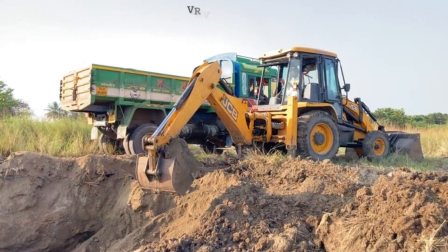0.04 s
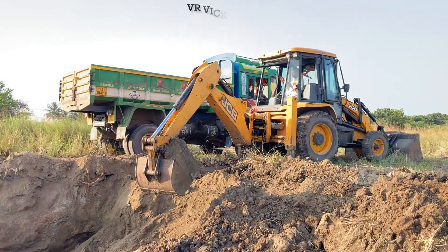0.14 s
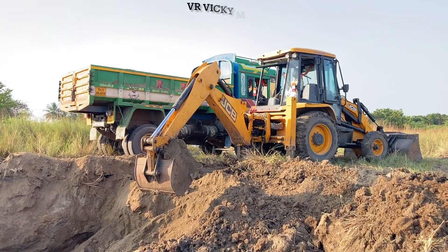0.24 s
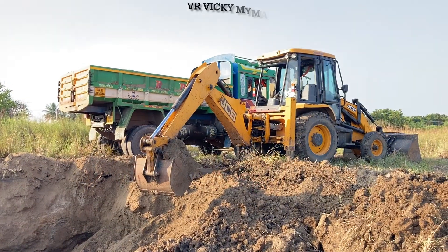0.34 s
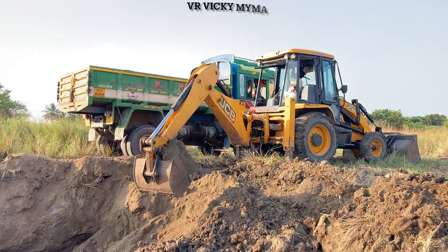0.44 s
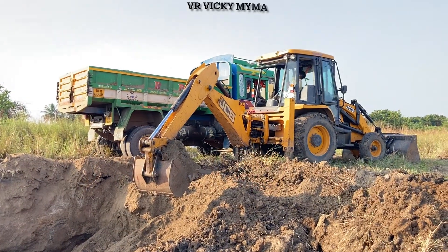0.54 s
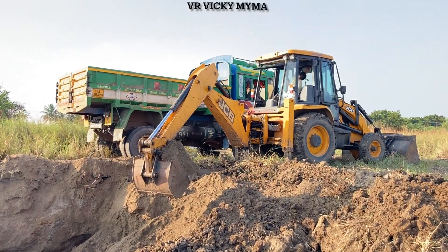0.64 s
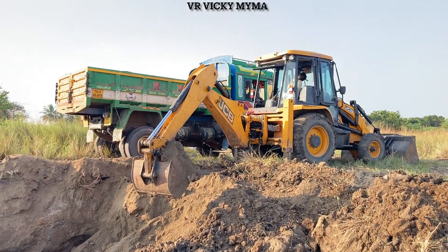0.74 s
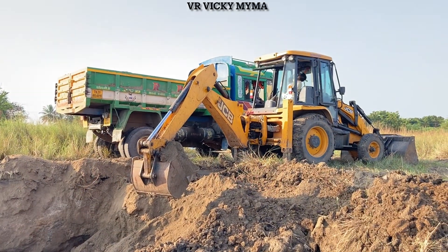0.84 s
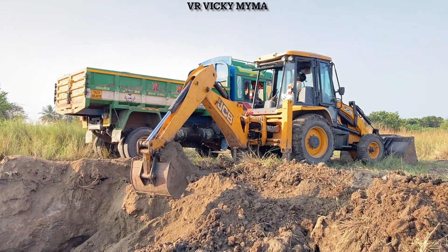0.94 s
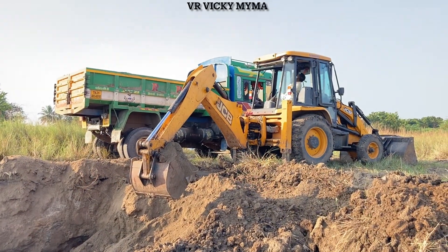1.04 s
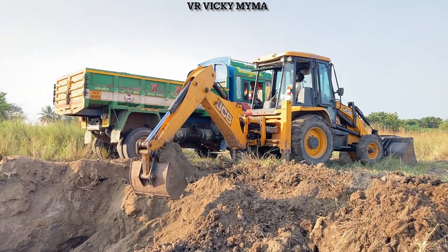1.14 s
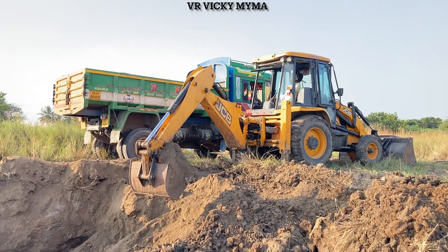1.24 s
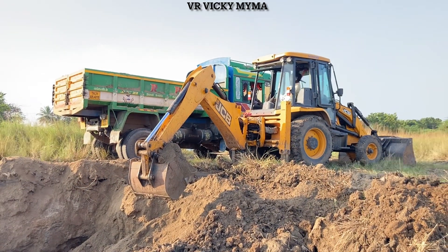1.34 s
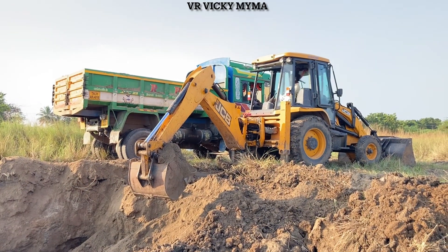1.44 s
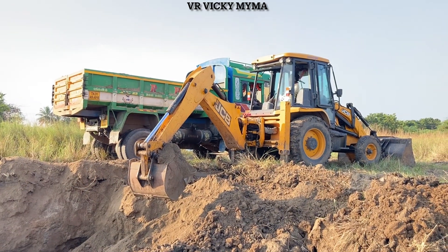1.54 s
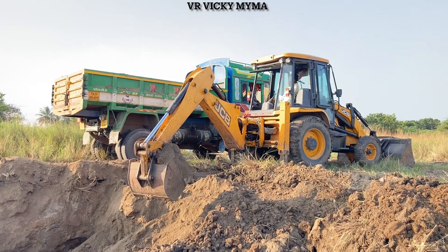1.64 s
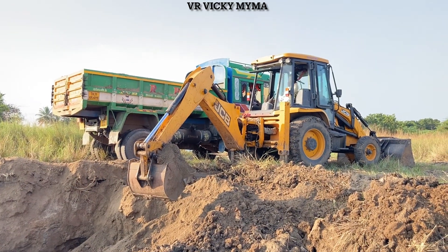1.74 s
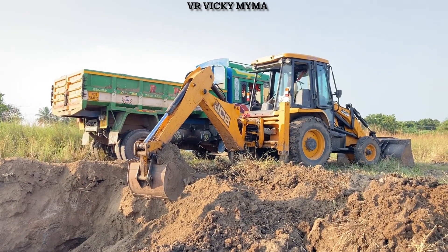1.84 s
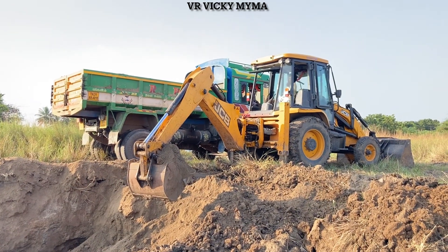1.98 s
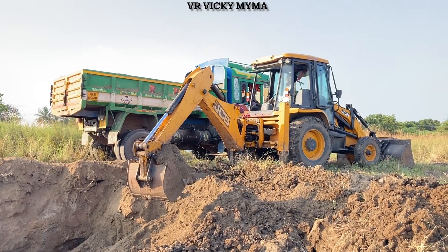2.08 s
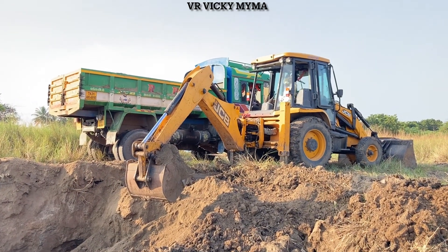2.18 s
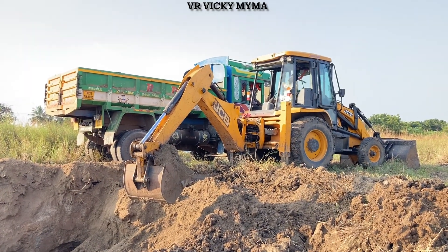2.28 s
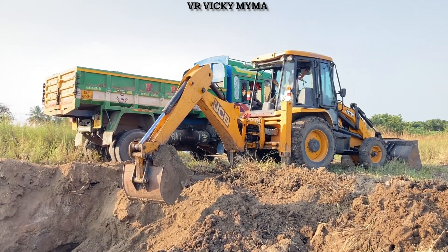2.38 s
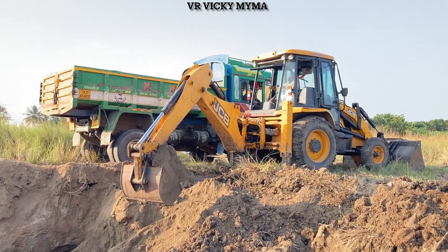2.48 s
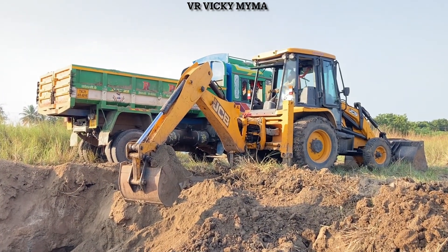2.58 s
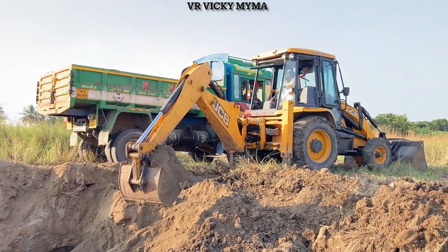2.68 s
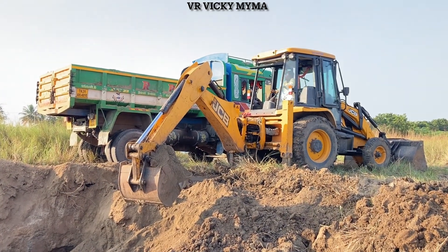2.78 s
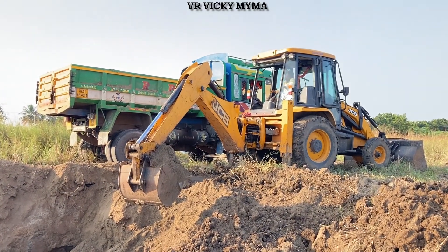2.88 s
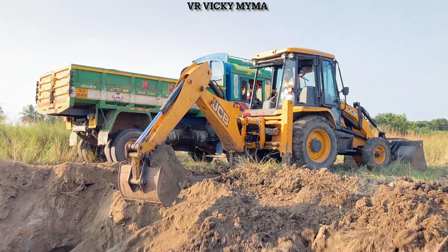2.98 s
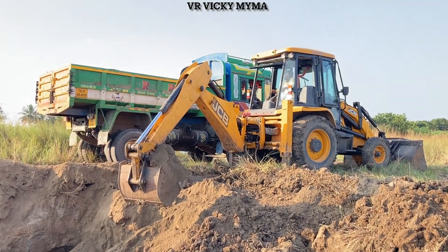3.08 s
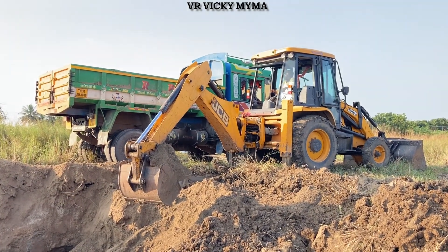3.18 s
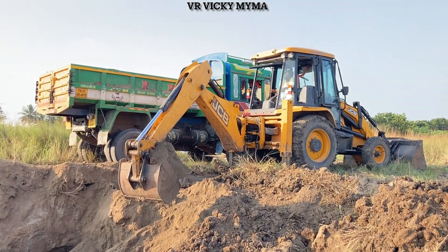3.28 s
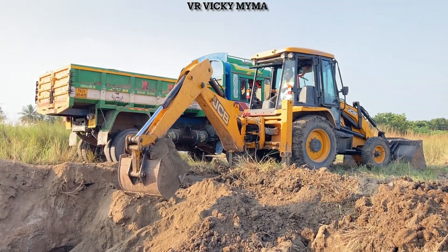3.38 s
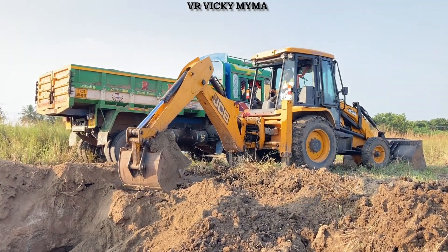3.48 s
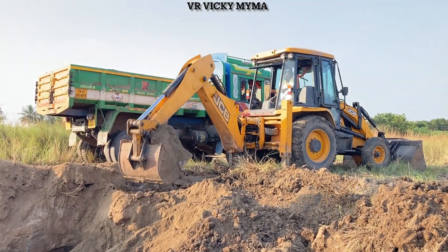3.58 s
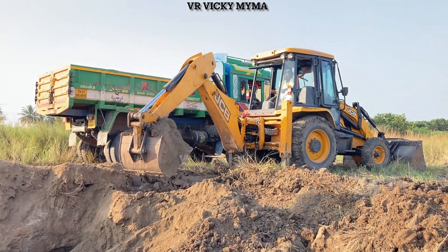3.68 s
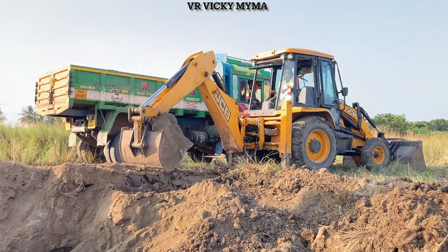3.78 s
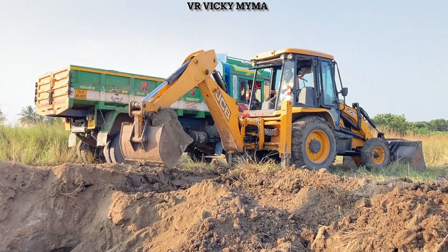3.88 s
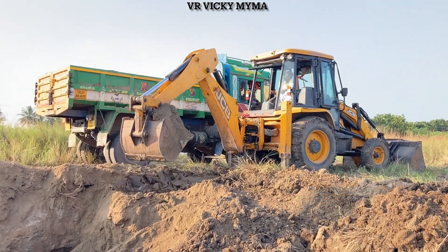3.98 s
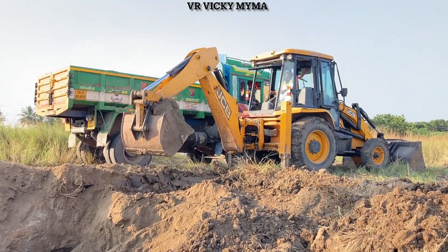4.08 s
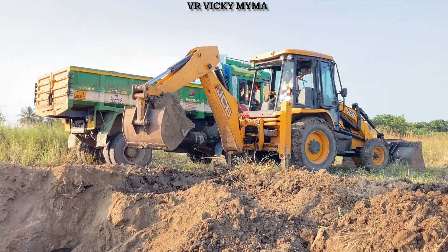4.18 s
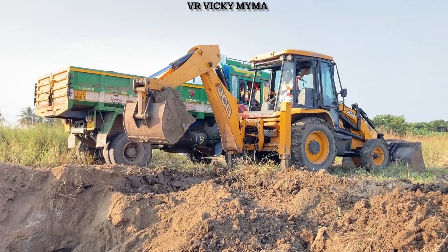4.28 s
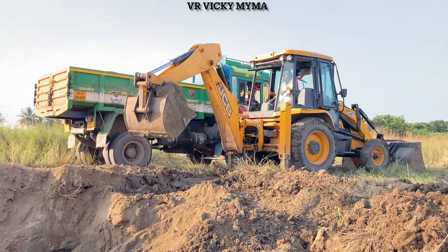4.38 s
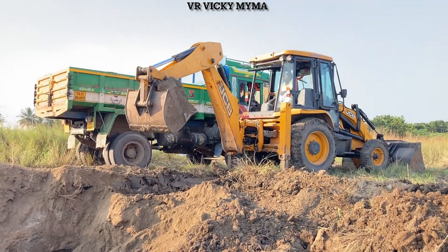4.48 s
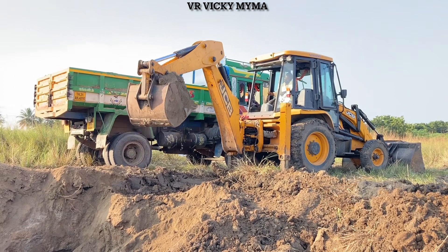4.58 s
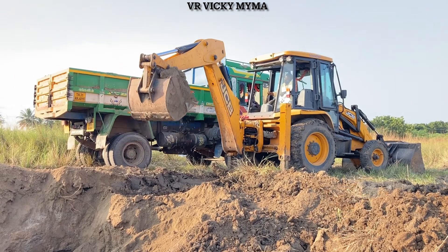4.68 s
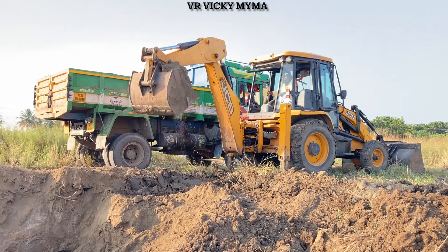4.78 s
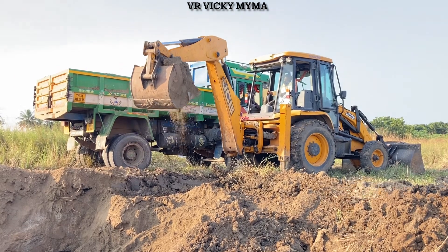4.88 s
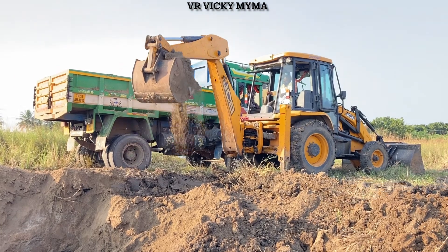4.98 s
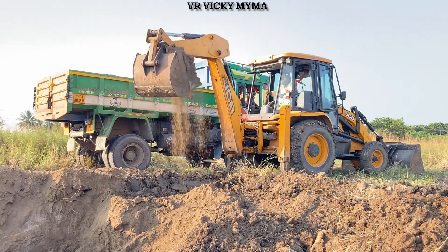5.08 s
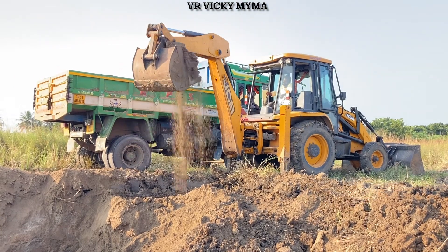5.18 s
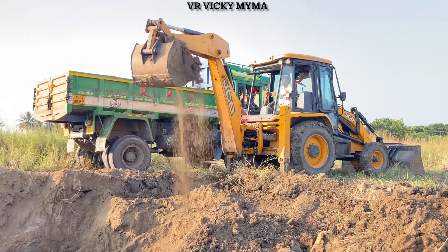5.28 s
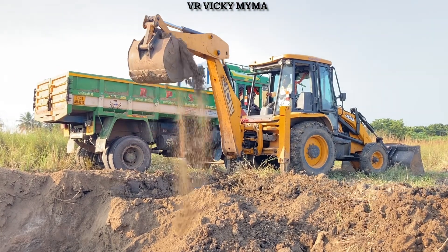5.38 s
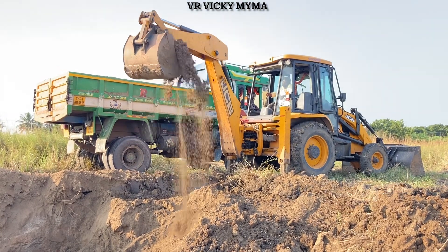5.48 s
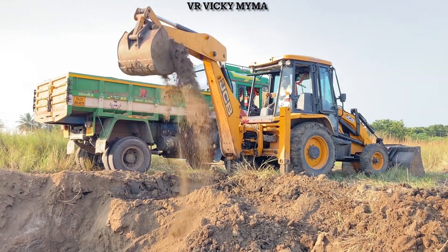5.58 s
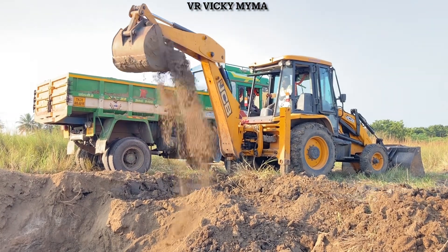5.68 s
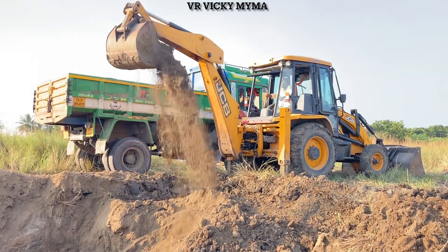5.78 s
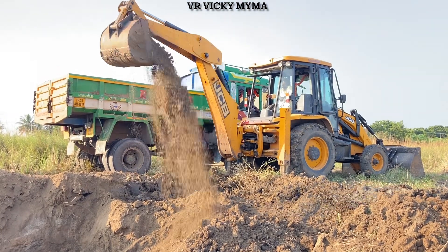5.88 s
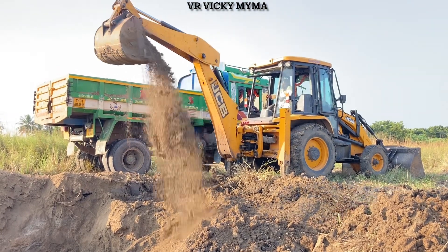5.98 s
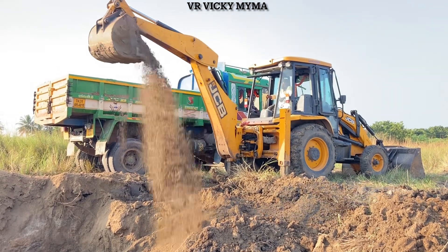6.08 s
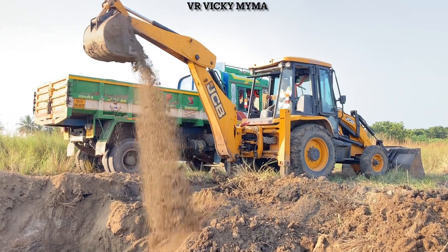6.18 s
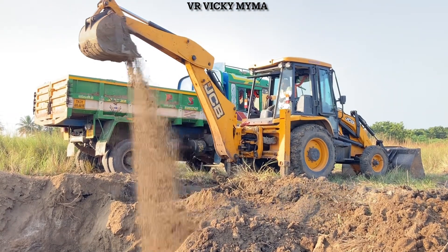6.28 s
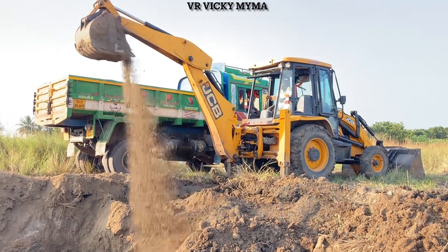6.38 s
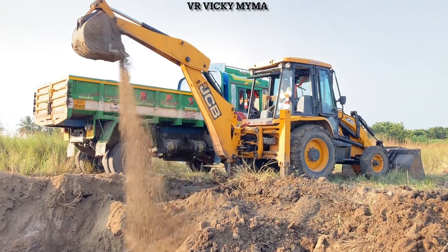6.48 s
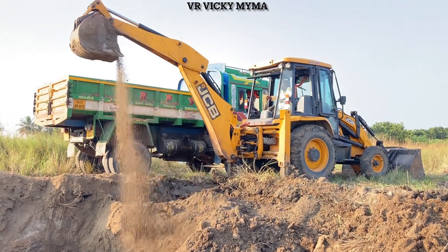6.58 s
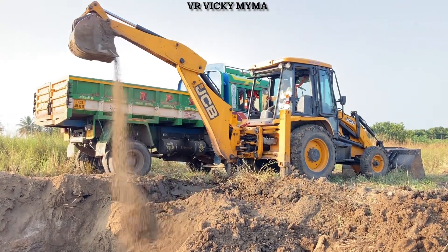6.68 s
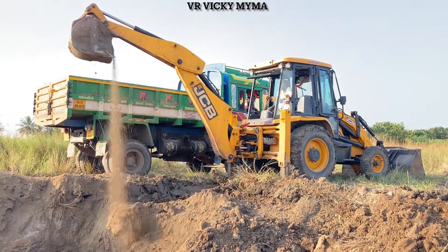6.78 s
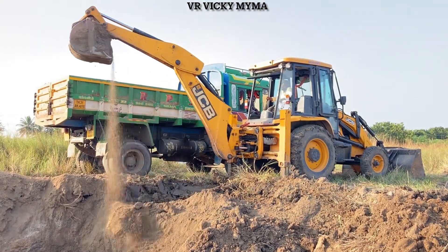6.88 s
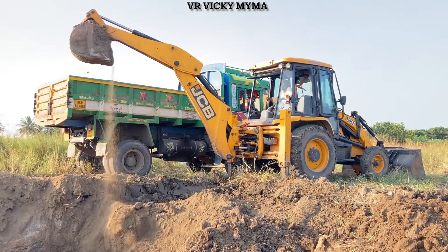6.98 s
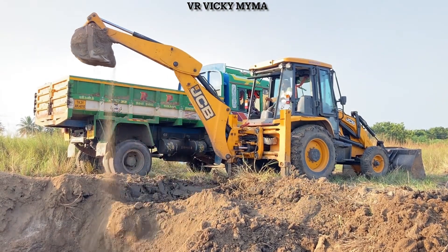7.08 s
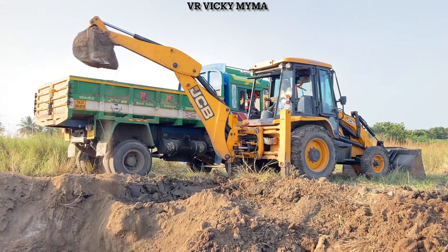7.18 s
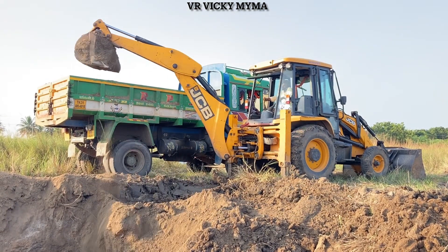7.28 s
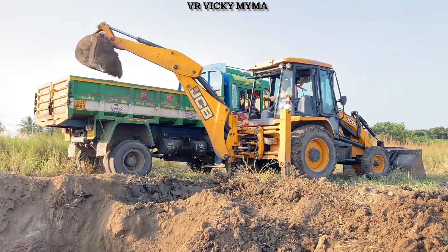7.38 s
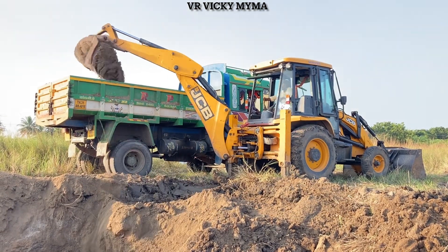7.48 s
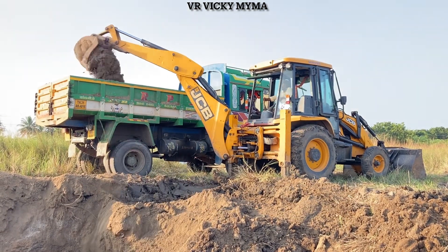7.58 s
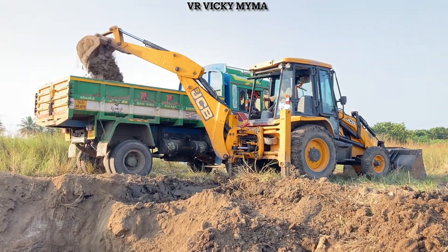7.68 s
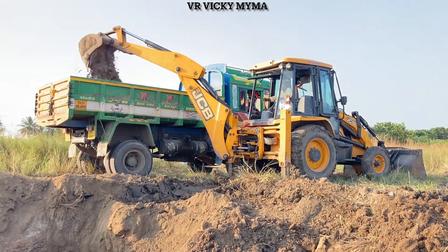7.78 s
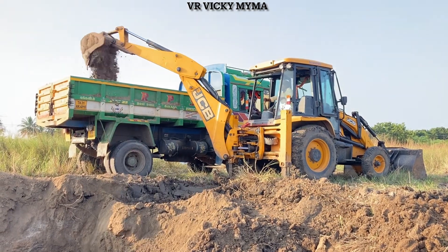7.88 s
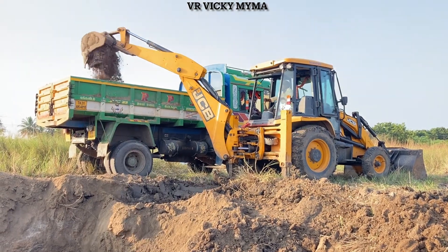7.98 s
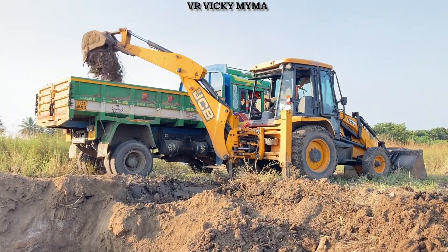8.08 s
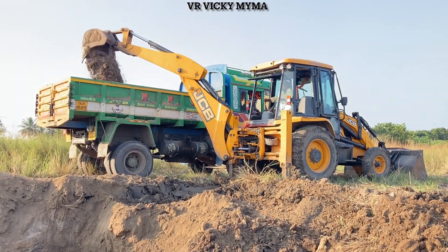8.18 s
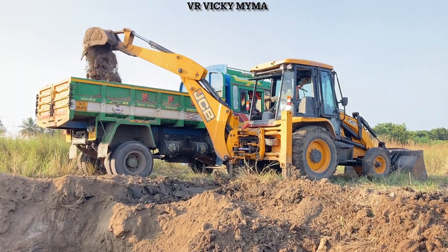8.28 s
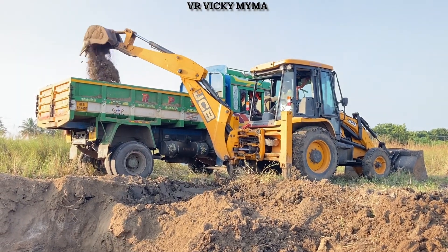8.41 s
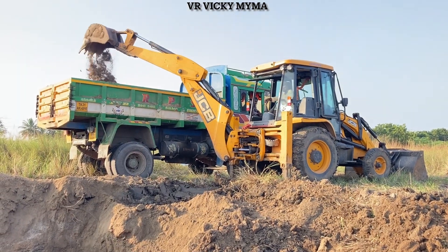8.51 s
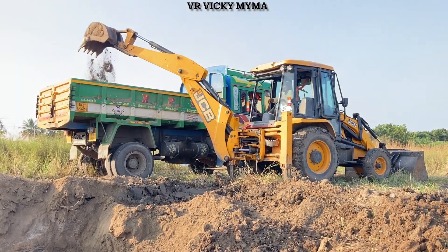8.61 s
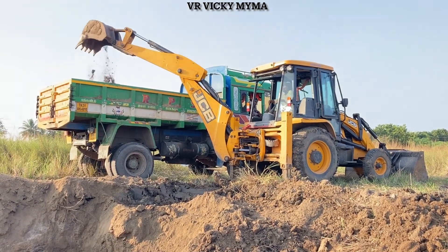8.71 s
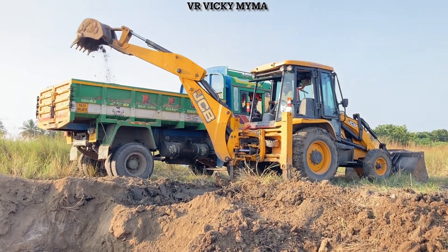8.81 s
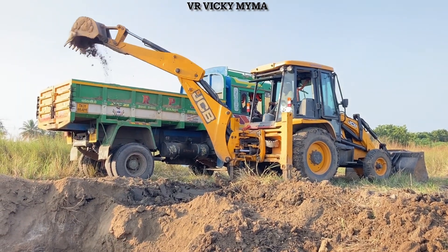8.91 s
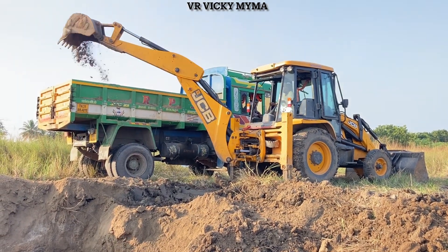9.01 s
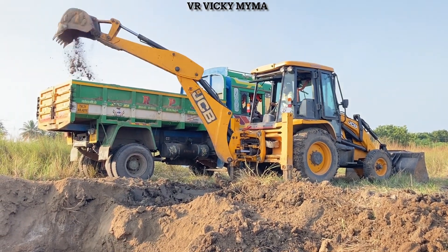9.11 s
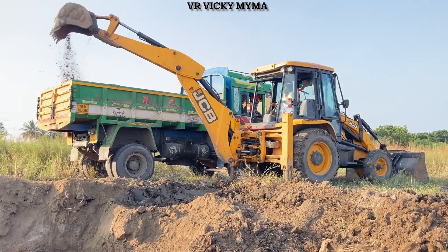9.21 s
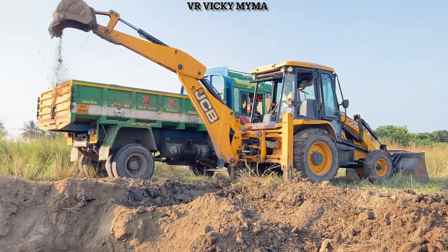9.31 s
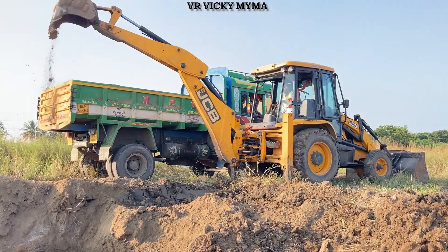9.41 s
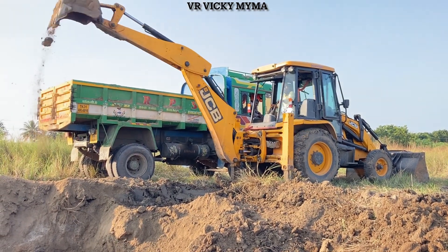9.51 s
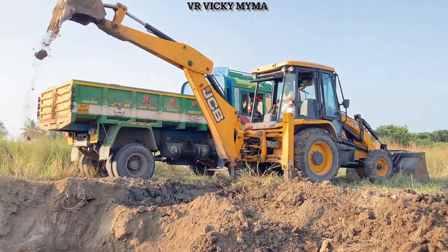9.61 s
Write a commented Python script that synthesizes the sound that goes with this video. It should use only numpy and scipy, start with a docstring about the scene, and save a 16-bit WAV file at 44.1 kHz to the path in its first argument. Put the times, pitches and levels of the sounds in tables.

```python
"""The four-cylinder diesel of a backhoe loader runs light, then sags and booms as the arm lifts.
Firing orders form its exhaust note; pulsed noise excites the damped modes of pipe, block and covers.
The hydraulic pump drones and whines as wavering tones on multiples of the firing rate.
Soil and gravel are granular noise; the bucket and clods falling into a steel tipper bed excite
steel modes by showers of impacts, with added pure notes. Slipping pins groan in gliding tones."""
import sys
import numpy as np
from scipy import signal
from scipy.fft import rfft, irfft, next_fast_len
from scipy.io import wavfile
from scipy.ndimage import map_coordinates

SR = 44100
rng = np.random.default_rng(int(sys.argv[2]) if len(sys.argv) > 2 else 0)


def wav_record(signal):
    """Record a signal, one row per channel, as 16-bit PCM in the file named by sys.argv[1]."""
    frames = np.transpose(np.atleast_2d(signal))
    bounded = np.clip(frames, -1, 1)
    # unit amplitude maps onto the largest positive 16-bit level
    quanta = np.round(bounded * 32767).astype(np.int16)
    wavfile.write(sys.argv[1], SR, quanta)


N = 425565
TIME = np.arange(N) / SR

# In tables of modes and noise spectra the levels are relative; an order is a multiple of the firing rate.
# Engine speed, which sags whenever the arm works: [t/s, firing rate f/Hz]
SPEED = [(0.0, 54.34), (3.05, 54.32), (3.22, 49.92), (3.45, 48.4), (3.75, 51.8), (4.05, 49.54),
         (4.4, 50.56), (4.65, 49.88), (5.25, 50.88), (5.8, 50.89), (6.15, 50.4), (6.5, 50.35), (7.1, 49.85),
         (7.33, 52.3), (7.55, 50.51), (7.72, 52.4), (7.9, 51.8), (8.6, 51.61), (8.73, 49.55), (9.03, 49.4),
         (9.25, 51.4), (9.65, 51.45)]
# Governor: no load at FREE_HZ, full load DROOP_HZ lower; exponent of load on sag; lag/s
FREE_HZ, DROOP_HZ, LOAD_BEND, GOVERNOR_S = 54.35, 4.74, 0.94, 0.096
# Exhaust orders: [order, relative level/dB running light, relative level/dB loaded]
NOTE = [(1, 0, 0), (1.5, -13, -23), (2, -11, -1), (2.5, -22, -24), (3, -1, -13), (3.5, -26, -18),
        (4, -17, -20), (4.5, -20, -21), (5, -19, -25), (6, -6.5, -26), (6.5, -12.5, -24), (9, -21, -26),
        (9.5, -22, -27), (10, -26, -24), (10.5, -33, -23), (11, -31, -24)]
NOTE_FULL_LOAD = 0.73  # load at which the loaded levels of NOTE are reached
# Exhaust boom: level running light, gain at full load, lag behind the load
BOOM_DB, BOOM_LOAD_DB, BOOM_LAG_S = -30, 6, 0.052
# Gear tones: [order, level/dB at no load]
GEARS = [(9.75, -49.5), (10.25, -54), (12, -59), (13, -53), (15, -70), (18, -51), (19, -54), (20, -55),
         (23, -63), (26, -61), (28, -52.5), (30, -57.5), (52, -70)]
# Silencer resonance: order that meets it, f/Hz, detuning/Hz that halves the amplitude, peak level/dB
SILENCER_ORDER, SILENCER_HZ, SILENCER_WIDTH_HZ, SILENCER_DB = 7, 350, 12, -31
# Engine clatter light and loaded, spectral density: [f/Hz, level/dB per Hz]
CLATTER_LIGHT = [(22, -27), (60, -1), (130, -9), (200, -0.5), (280, -4), (345, -0.5), (410, -8.5),
                 (520, -7), (630, -14.5), (850, -14.5), (970, -15.5), (1200, -17.5), (1550, -15),
                 (2100, -28.5), (4500, -56)]
CLATTER_LOADED = [(22, -32), (60, -3.5), (130, -6), (200, 0.5), (280, -3.5), (345, -3), (410, -10),
                  (520, -5.5), (630, -16.5), (850, -11.5), (970, -18), (1200, -16.5), (1550, -16.5),
                  (2100, -23.5), (4500, -38.5)]
# Block modes excited by combustion knock: [f/Hz, width/Hz, level/dB]
BLOCK = [(509.6, 16.7, 11), (959, 31, 3), (1090, 60, -11), (1600, 500, -31), (1879, 24, -1.5),
         (2470, 130, -15)]
# Knock strength of each cylinder in firing order: [level/dB]
CYLINDERS = [-2, 1.5, 2.5, 5]
# Thin engine covers that rattle along: [f/Hz, width/Hz, level/dB]
PANELS = [(2186, 11, -17), (2258, 8.5, 16.5), (3030, 13, 8), (3300, 10, 12.5), (3830, 11, -22),
          (4150, 11, 13.5), (8000, 46, 3.5)]
# Fan and oil hiss, spectral density: [f/Hz, level/dB per Hz]
HISS = [(20, -38), (1200, -26), (2200, -2.5), (3000, -0.5), (4200, -1), (5400, -5.5), (6400, -8.5),
        (7500, -5.5), (9600, -7.5), (12000, -4), (14200, -8), (15600, -0.5)]
# Exhaust pipe modes that bark and block modes that rap: [f/Hz, width/Hz, level/dB]
PIPE = [(343, 42, -4), (535.5, 26, 1)]
RAP = [(932, 28, -1), (1068, 90, -9), (1500, 170, -18)]
RAP_DB = -40.3  # at full load
# Delays in firing periods; slap level against the rap
BARK_DELAY, SLAP_DELAY, SLAP_DB = 0.28, 0.45, -4.5
# Uneven surges of the bark: spread/dB, changes a second
SURGE_DB, SURGE_PER_S = 3, 18
# Single hard knocks in the engine: [t/s, level/dB]
HARD_KNOCKS = [(1.3, -25.5), (1.959, -26), (3.304, -27), (3.384, -20), (4.659, -22.5), (4.976, -19.5),
               (5.057, -17)]
# Knock modes: [f/Hz, width/Hz, level/dB]
HARD_KNOCK_MODES = [(550, 360, -8), (960, 90, 8.5), (1700, 400, -21)]
HARD_KNOCK_T60_S = 0.018  # decay of the rasp that excites the knocks

# Ram strokes during which the pump drones, adding where they overlap: [start t/s, end t/s, level/dB]
STROKES = [(3.13, 3.95, -32.5), (3.87, 5.15, -33), (4.42, 5.05, -42), (6.3, 7.3, -40), (8.58, 9.3, -33)]
PUMP_ORDER, STROKE_RAMP_S = 6, 0.13
# Pump whine while the boom rises: [order, start t/s, end t/s, level/dB]
WHINES = [(12, 3.55, 4.05, -41), (12, 4.9, 5.65, -47), (36, 5.38, 6.25, -46), (30, 5.7, 7.08, -39.5),
          (18, 6.05, 6.85, -47)]
PRESSURE_S = 0.51  # ramp of the whine as oil pressure builds and falls
# Modes of the valve's hiss: [f/Hz, width/Hz, level/dB]
VALVE = [(2400, 1100, 3), (3850, 110, 9), (4150, 630, 6), (5070, 120, 6), (6260, 160, 4), (7200, 500, -6)]

# Soil pouring off the bucket: [start t/s, end t/s, level/dB]
POURS = [(3.385, 3.705, -39), (6.45, 7.405, -42.5), (7.42, 8.303, -43), (8.617, 9.75, -38)]
POUR_RAMP_S = 0.13
# Spectral density of pouring soil: [f/Hz, level/dB per Hz]
SOIL = [(300, 6.5), (900, 10), (2000, -7), (4000, -6), (6300, -15.5), (10000, -15.5), (16000, -14)]
# Gravel sliding over steel: [start t/s, end t/s, level/dB]
GRAVEL = [(7.454, 7.55, -43), (7.755, 7.813, -43), (8.672, 8.78, -42.5), (9.355, 9.55, -47)]
GRAVEL_RAMP_S = 0.014
# Modes rung by the gravel: [f/Hz, width/Hz, level/dB]
STONES = [(3400, 500, -6), (7240, 900, 5), (10000, 460, 10), (11800, 1300, 4), (15300, 900, -8)]
# Groans as the bucket tips and lifts away: [start t/s, end t/s, first f/Hz, last f/Hz, level/dB]
GROANS = [(7.555, 7.645, 700, 1150, -31), (7.595, 7.7, 1830, 1770, -39), (9.25, 9.345, 740, 770, -30)]
# Groan ramp; rms pitch jitter as a fraction; rms roughness
GROAN_RAMP_S, GROAN_JITTER, GROAN_ROUGH_DB = 0.025, 0.028, -4
# Chatter of the loose bucket linkage: [start t/s, end t/s, level/dB]
RATTLES = [(8.115, 8.232, -48)]
RATTLE_RAMP_S = 0.035
# Linkage modes as it chatters: [f/Hz, width/Hz, level/dB]
RATTLE = [(3900, 60, 9), (4250, 160, 1), (4600, 200, -3)]

# Bucket knocks and falling clods: [t/s, strength level/dB, weight level/dB (shakes the bed),
# hardness level/dB (0 steel on steel, -20 earth on steel), plate shower t60/s, top of plate ring f/Hz]
KNOCKS = [(7.069, -33, -8, -6, 0.11, 4600), (7.152, -31.5, 8, -5, 0.13, 2500),
          (7.172, -24.5, 4.5, 1, 0.14, 2500), (7.228, -24.5, 3, -15, 0.17, 3400),
          (7.252, -21, -1, -15, 0.1, 3800), (7.556, -25, 2.5, -35, 0.12, 1900),
          (7.611, -29, 0, -16, 0.12, 3000), (7.65, -29.5, 7, -20, 0.15, 2600),
          (7.689, -18, 3.5, -6.5, 0.19, 4300), (7.729, -21, 0.5, -10, 0.13, 3540),
          (7.924, -29.5, 9.5, -0.5, 0.16, 4000), (8.159, -36, 11.5, -1, 0.15, 4500),
          (8.541, -22, 0.5, -17, 0.15, 3700), (8.713, -30.5, 9, -10, 0.27, 2580),
          (8.773, -24.5, 5.5, -3.5, 0.2, 3750), (8.833, -23, -9, -7, 0.14, 4600),
          (9.212, -26.5, 4, -17, 0.17, 3300), (9.535, -13, -6.5, -6, 0.089, 5400),
          (9.553, -20, -1.5, -20, 0.28, 4800), (9.581, -15.5, -2.5, -15, 0.16, 2500),
          (9.598, -16, -2, -7.5, 0.13, 4900), (9.617, -28, -4, -14, .1, 2600),
          (9.627, -14.5, -5, -10, 0.14, 5200)]
# Modes of the bed, the steel plate and the linkage: [f/Hz, width/Hz, level/dB]
BED = [(158, 22, 3), (236, 240, -5), (351, 104, 5), (430, 34, 8), (500, 160, -26), (700, 120, -12)]
STEEL = [(687, 110, 0.5), (766, 60, -12), (956, 30, 7), (1030, 110, 4), (1470, 150, -18), (1640, 280, 0),
         (1855, 35, 4), (2280, 57, -1.5), (2640, 190, -9), (2960, 39, -5), (3420, 810, -6), (3800, 60, -5),
         (4300, 700, -12)]
LINKS = [(4300, 1700, 15), (7400, 400, 7.5), (7980, 220, 16.5), (10050, 320, 12), (12260, 390, -7),
         (13700, 1000, -10)]
# Rise constants of the impact showers; decay of those on bed and linkage
PLATE_RISE_S, BED_RISE_S, LINK_RISE_S = 0.0062, 0.0085, 0.0064
BED_T60_S, LINK_T60_S = 0.24, 0.12
# Each dB of hardness above MEDIUM_DB tilts the plate's modes up by BRIGHTEN dB an octave
MEDIUM_DB, BRIGHTEN = -10.5, 0.11
# Sharp first contacts of steel and hard clods, and rebounds: [t/s, level/dB]
CRACKS = [(7.1735, -23), (7.183, -24), (7.2505, -15.5), (7.294, -24), (7.559, -26), (7.692, -17),
          (7.7025, -18), (7.7295, -21), (7.739, -22), (7.931, -27), (8.545, -23), (8.564, -24),
          (8.719, -28), (8.785, -22), (8.842, -21), (9.5365, -17), (9.584, -18), (9.598, -18), (9.607, -19),
          (9.6322, -10.5)]
CRACK_T60_S = 0.011  # decay of the rasp that excites them
# Modes of these contacts: [f/Hz, width/Hz, level/dB]
CRACK = [(970, 140, 14), (1420, 420, 15), (2350, 700, 2.5), (3400, 960, -1), (7000, 890, -11.5)]
# Single clear notes in struck steel: [t/s, f/Hz, peak level/dB, t60/s]
PINGS = [(7.069, 4300, -26, .08), (7.174, 2270, -31, .13), (7.182, 7900, -22.5, 0.078),
         (7.183, 12000, -23, .042), (7.186, 3128, -26, 0.12), (7.191, 980, -22, 0.11),
         (7.251, 950, -23, 0.087), (7.575, 7160, -27, 0.042), (7.697, 608, -24, .15),
         (7.699, 3052, -30, .15), (7.707, 7400, -26, .05), (7.733, 334, -13, 0.084),
         (7.933, 5330, -27, 0.16), (8.544, 3500, -24, 0.054), (8.546, 1100, -26, 0.18),
         (8.782, 3560, -27, .11), (8.785, 1830, -30, .14), (8.794, 650, -21, 0.054),
         (9.218, 2280, -33, 0.2), (9.538, 2350, -24, .2), (9.538, 4000, -25, .12), (9.539, 4750, -27, .15),
         (9.606, 265, -13, 0.32), (9.61, 178, -19, .3), (9.633, 2350, -18, .1)]

# Coherence of the two microphone ports: [f/Hz, likeness from 0 to 1]
SAME = [(60, .995), (300, .99), (700, .94), (1400, .9), (2500, .7), (4000, .62), (5800, .4), (7000, .88),
        (9000, .93), (16000, .93)]
# Balance of the ports: [f/Hz, left minus right level/dB]
LEAN = [(60, -2), (110, -4.5), (200, 0.5), (380, -1), (700, 2), (1290, 1.5), (2000, 4), (3200, 0.5),
        (8000, -0.5)]
# Phase by which the left port leads, for engine and bucket: [f/Hz, phase/rad]
ENGINE_SIDE = [(400, 0), (1800, -.4), (2670, -1.2), (3550, 0), (4800, -1), (5700, -2.6), (6400, 0)]
BUCKET_SIDE = [(100, 0), (1500, .7), (2500, 1.5), (3600, 2.1), (5400, 2.8), (6800, 0)]
EDGE_HZ = 15900  # upper band limit


def amp(db):
    """Logarithmic level: decibels to amplitude gain."""
    return 10 ** (np.asarray(db) / 20)


def unit(x):
    """Power normalisation: scales to rms 1."""
    return x / np.sqrt(np.mean(x ** 2) + 1e-20)


def curve(rows):
    """Linear interpolation: each column of a timed table, sample by sample."""
    s, *columns = np.transpose(rows)
    return [np.interp(TIME, s, c) for c in columns]


def read(points, hz):
    """Logarithmic frequency scale: interpolates a spectrum table."""
    f, value = np.transpose(points)
    return np.interp(np.log(hz + 1), np.log(f + 1), value)


def shape(x, response):
    """Linear filtering: multiplies the spectrum of x by a function of frequency."""
    size = next_fast_len(N + 4096, True)
    spectrum = rfft(x, size) * response(np.fft.rfftfreq(size, 1 / SR))
    return irfft(spectrum, size)[..., :N]


def wander(hz):
    """Band-limited chance: rms 1, about hz changes a second, in steps of 50 samples."""
    points = rng.standard_normal(4000)
    steps = map_coordinates(points, [TIME[::50] * hz], order=3, mode="wrap")
    return unit(steps).repeat(50)[:N]


def noise(spectrum):
    """Spectral shaping: two unrelated noises of the given colour."""
    return unit(shape(rng.standard_normal((2, N)), lambda f: amp(read(spectrum, f))))


def ring(x, modes):
    """Modal superposition: x excites damped modes; white noise keeps its power."""
    t = np.arange(4096) / SR
    body = np.zeros(len(t))
    for k, (hz, width, db) in enumerate(modes):
        decay = width * np.exp(-np.pi * width * t)
        body += (-1) ** k * amp(db) * decay * np.cos(2 * np.pi * hz * t + k * k)
    high_pass = signal.butter(2, modes[0][0] / 2, "high", fs=SR, output="sos")
    body = signal.sosfilt(high_pass, body)
    body /= np.linalg.norm(body)
    return signal.oaconvolve(x, body[None], axes=1)[:, :x.shape[1]]


def ports(pair, side):
    """Partial coherence: mixes two signals into one source with a phase lead between the ports."""
    def mixing(f):
        same = np.clip(read(SAME, f), -1, 1)
        return np.exp(-1j * read(side, f)) * np.array([same, np.sqrt(1 - same ** 2)])
    return np.array([pair[0], shape(pair, mixing).sum(0)])


def grit(size, spread_db):
    """Granular noise: half-millisecond grains of very unequal strength."""
    grain_db = spread_db * np.minimum(rng.exponential(1, size // 24 + 1), 3.2)
    return unit(rng.standard_normal((2, size)) * amp(grain_db).repeat(24)[:size])


def tone(turns, multiple, waver):
    """Harmonic order: a sinusoid locked to the firings, wavering in strength and phase."""
    angle = (2 * np.pi * multiple * turns + waver * wander(9)).astype(np.float32)
    return np.sqrt(2) * (1 + waver * wander(9)) * np.sin(angle)


def swell(start, end, ramp):
    """Amplitude envelope: rises at start, holds, and falls to nothing at end."""
    return np.clip(np.minimum(TIME - start, end - TIME) / ramp, 0, 1)


def lagged(x, seconds):
    """First-order lag: exponential approach with the given time constant."""
    keep = np.exp(-1 / (seconds * SR))
    return signal.lfilter([1 - keep], [1, -keep], x)


def add(mix, s, sound):
    """Superposition: mixes a sound in at s seconds."""
    part = mix[:, round(s * SR):][:, :sound.shape[1]]
    part += sound[:, :part.shape[1]]


def struck(modes):
    """Modal participation: a blow on another spot shifts and reweighs the modes."""
    return [(hz * (1 + .01 * rng.standard_normal()), width, db + 2 * rng.standard_normal())
            for hz, width, db in modes]


def crunch(modes, rise, t60):
    """Multiple impact: a quickly dying shower of small impacts excites one steel part."""
    t = np.arange(SR // 3) / SR
    envelope = (1 - np.exp(-t / rise)) * amp(-60 * t / t60)
    shower = envelope * grit(size=len(t), spread_db=3)
    return ring(shower, struck(modes))


def firings(turns, jitter, spread_db):
    """Impulse train: one click a firing, each a little early or late and of its own strength."""
    count = np.maximum.accumulate((turns + jitter * wander(50)).astype(int))
    due = np.diff(count, prepend=count[0]) > 0
    strength = amp(spread_db * np.clip(rng.standard_normal(N), -2, 1.4))
    return np.array([unit(due * strength), np.zeros(N)])


def soil(flutter_db=5.5):
    """Granular flow: dry soil trickles off the bucket in uneven clumps."""
    grains = unit(shape(grit(size=N, spread_db=1.0), lambda f: amp(read(SOIL, f))))
    flow = sum(amp(db) * swell(a, b, POUR_RAMP_S) for a, b, db in POURS)
    return grains * flow * amp(flutter_db * wander(25))


def gravel():
    """Granular excitation: small stones patter on ringing steel as the load slides."""
    flow = sum(amp(db) * swell(a, b, GRAVEL_RAMP_S) for a, b, db in GRAVEL)
    return flow * ring(grit(size=N, spread_db=6), STONES)


def groans():
    """Stick-slip friction: dry pins and earth slip on steel in a rough, gliding note."""
    out = np.zeros((2, N))
    for start, end, from_hz, to_hz, db in GROANS:
        hz = np.interp(TIME, [start, end], [from_hz, to_hz]) * (1 + GROAN_JITTER * wander(250))
        slips = amp(GROAN_ROUGH_DB * wander(120))
        note = np.sin(2 * np.pi * np.cumsum(hz) / SR)
        out[0] += amp(db) * swell(start, end, GROAN_RAMP_S) * slips * note
    return out


def rattle():
    """Repeated impact: the slack linkage chatters in uneven bursts and rings."""
    shake = sum(amp(db) * swell(a, b, RATTLE_RAMP_S) for a, b, db in RATTLES)
    return ring(shake * grit(size=N, spread_db=5), RATTLE)


def pings():
    """Free vibration: each note of struck steel is one exponentially decaying sinusoid."""
    out, t = np.zeros((2, N)), np.arange(SR // 3) / SR
    for s, hz, db, t60 in PINGS:
        note = amp(db - 60 * t / t60) * np.sin(2 * np.pi * hz * t)
        add(out[:1], s, note[None])
    return out


def contacts(rows, modes, t60):
    """Impulsive excitation: a sharp edge and a quickly dying rasp ring the part."""
    out, t = np.zeros((2, N)), np.arange(SR // 10) / SR
    dying = amp(-60 * t / t60)
    for s, db in rows:
        contact = dying * rng.standard_normal((2, len(t))) + 3 * (t == 0)
        hit = ring(contact, modes)
        hit /= np.linalg.norm(hit, axis=1, keepdims=True)
        add(out, s, amp(db) * np.linalg.norm(dying) * hit)
    return out


def knocks(thud_db=1, clang_db=3, chink_db=3):
    """Modal excitation: impact showers ring bed, plate and linkage; hard blows favour the last."""
    out = np.zeros((2, N))
    for s, strength, weight, hardness, plate_t60, top_hz in KNOCKS:
        plate_top = signal.butter(6, top_hz, fs=SR, output="sos")
        tilt = BRIGHTEN * (hardness - MEDIUM_DB)  # dB an octave
        plate = [(hz, width, db + tilt * np.log2(hz / STEEL[0][0])) for hz, width, db in STEEL]
        thud = amp(thud_db + weight) * crunch(BED, BED_RISE_S, BED_T60_S)
        clang = amp(clang_db) * signal.sosfilt(plate_top, crunch(plate, PLATE_RISE_S, plate_t60))
        chink = amp(chink_db + hardness) * crunch(LINKS, LINK_RISE_S, LINK_T60_S)
        add(out, s, amp(strength) * (thud + clang + chink))
    return out


def valve(start=3.472, end=3.65, open_s=0.021, valve_db=-36):
    """Flow noise: oil hisses as the bucket breaks free of the ground, dying with the pressure."""
    pressure = np.clip((end - TIME) / (end - start), 0, 1)
    opening = swell(start, end, open_s) * pressure
    return amp(valve_db) * opening * ring(grit(size=N, spread_db=3), VALVE)


def pump(turns):
    """Pressure ripple: orders of the pump drone through ram strokes and whine as the boom rises."""
    shaft = turns + rng.random()
    ripple = unit(amp(2.2 * wander(30)))
    effort = sum(amp(db) * swell(a, b, STROKE_RAMP_S) for a, b, db in STROKES)
    drone = effort * ripple * tone(shaft, PUMP_ORDER, waver=.13)
    whine = sum(amp(db) * swell(a, b, PRESSURE_S) * tone(shaft, k, waver=.1) for k, a, b, db in WHINES)
    return drone + whine


def gears(turns, load, gear_load_db=-9):
    """Gear-mesh orders: timing gears sing while the engine runs light and fade under load."""
    return amp(gear_load_db * load) * sum(amp(db) * tone(turns, k, waver=0.36) for k, db in GEARS)


def silencer(turns, rate, load):
    """Resonance: under load the silencer rings, unsteadily, as the seventh order meets its mode."""
    detune = (SILENCER_ORDER * rate - SILENCER_HZ) / SILENCER_WIDTH_HZ
    resonance = np.clip(load, 0, 1) / (1 + detune ** 2)
    flutter = unit(amp(2.5 * wander(22)))
    return amp(SILENCER_DB) * resonance * flutter * tone(turns, SILENCER_ORDER, waver=.25)


def hard_knocks():
    """Impulsive excitation: single hard knocks in the engine ring briefly."""
    return contacts(HARD_KNOCKS, HARD_KNOCK_MODES, HARD_KNOCK_T60_S)


def clatter(turns, load, light_db=-33, loaded_db=-32, throb=0.012, knock_db=-48, knock_load_db=9,
            panel_db=-56, hiss_db=-42.0, hiss_load_db=0.44):
    """Forced vibration: casing noise throbs; uneven combustion knocks excite block and panels."""
    duty = np.clip(load, 0, 1)
    casing = amp(light_db) * np.sqrt(1 - duty) * noise(CLATTER_LIGHT)
    casing += amp(loaded_db) * np.sqrt(abs(load)) * noise(CLATTER_LOADED)
    # one throb a firing, one every four firings
    casing *= 1 + throb * np.sin(2 * np.pi * turns) + 0.034 * np.sin(np.pi * turns / 2)
    timing = turns + 0.057 * wander(40)  # each knock comes a little early or late
    firing = timing.astype(int)
    chance_db = 2.5 * np.clip(rng.standard_normal(N)[firing], -2, 1.3)
    strength = amp(np.take(CYLINDERS, firing, mode="wrap") + chance_db)
    blow = unit(strength * np.exp(-(timing % 1) / .19))
    burst = blow * rng.standard_normal((2, N))
    knock = amp(knock_db + knock_load_db * load) * ring(burst, BLOCK)
    panels = amp(panel_db) * ring(burst, PANELS)
    hiss_gain = amp(hiss_db + hiss_load_db * load + 0.58 * wander(14))
    hiss = hiss_gain * noise(HISS) * unit(1 + 0.15 * blow)
    return casing + knock + panels + hiss


def chug(turns, load, pipe_db=-35):
    """Impulse response: loaded firings bark in the pipe; each raps the block and slaps it again."""
    surge = unit(amp(SURGE_DB * np.clip(wander(SURGE_PER_S), -2, 1.3)))
    bark = ring(surge * firings(turns - BARK_DELAY, jitter=.04, spread_db=4), PIPE)
    strokes = firings(turns, jitter=.1, spread_db=4.2)
    strokes += amp(SLAP_DB) * firings(turns - SLAP_DELAY, jitter=.12, spread_db=3)
    return np.clip(load, 0, 1.2) * (amp(pipe_db) * bark + amp(RAP_DB) * ring(strokes, RAP))


def exhaust(turns, load, boom_db, waver=.028):
    """Fourier synthesis of firing pulses: load swells the second order and drains the third."""
    duty = np.clip(load / NOTE_FULL_LOAD, 0, 1)
    stack = np.zeros(N)
    for k, light, loaded in NOTE:
        offset = 2 * (k % 1) * rng.random()  # half orders fall anywhere in the cycle
        stack += amp(light + (loaded - light) * duty) * tone(turns + offset, k, waver * k)
    return amp(boom_db) * stack


def scene():
    """Superposition: speed sag sets load; engine noise leans right, bucket and tipper left."""
    rate, = curve(SPEED)
    turns = np.cumsum(rate) / SR  # counted in firings
    sag = np.maximum((FREE_HZ - rate) / DROOP_HZ, 0)
    load = lagged(sag ** LOAD_BEND, GOVERNOR_S)
    boom_db = BOOM_DB + BOOM_LOAD_DB * lagged(load, BOOM_LAG_S)
    blows = knocks() + contacts(CRACKS, CRACK, CRACK_T60_S) + pings()
    bucket = ports(soil() + gravel() + blows + rattle() + groans(), BUCKET_SIDE)
    body = ports(valve() + hard_knocks() + clatter(turns, load) + chug(turns, load), ENGINE_SIDE)
    # the tones reach both ports alike
    tones = exhaust(turns, load, boom_db) + silencer(turns, rate, load) + gears(turns, load) + pump(turns)
    return bucket + body + tones


def record(dry):
    """Linear reception: unequal ports, a widening that delays the left treble, and the band limit."""
    def widening(f):
        lag = np.exp(-2j * np.pi * np.maximum(f - 6850, 0) * .000222)  # Hz, s
        lean_db = read(LEAN, f) / 2
        return np.array([amp(lean_db) * lag, amp(-lean_db)])
    band = signal.firwin(511, EDGE_HZ, window=("kaiser", 9), fs=SR)
    return signal.oaconvolve(shape(dry, widening), band[None], "same")


dry = scene()
out = record(dry)
wav_record(out)
```